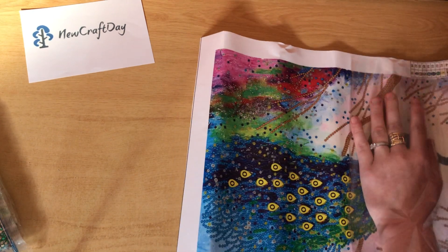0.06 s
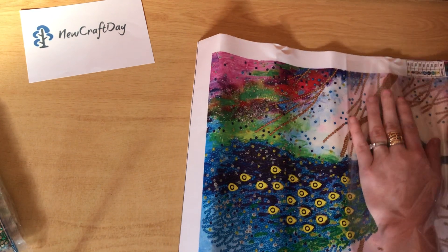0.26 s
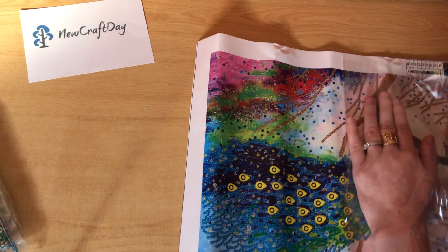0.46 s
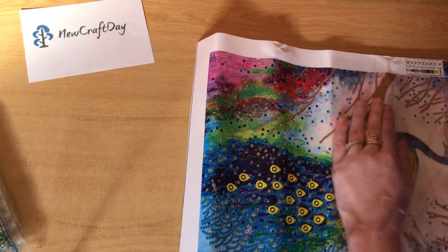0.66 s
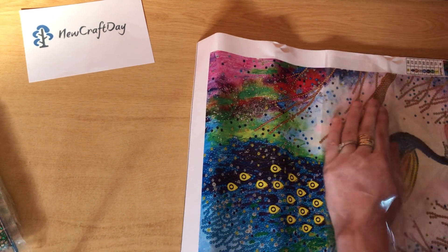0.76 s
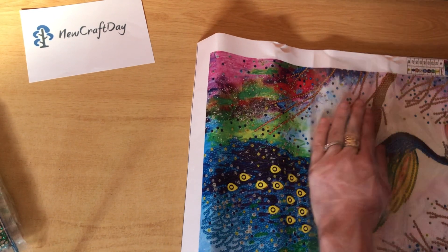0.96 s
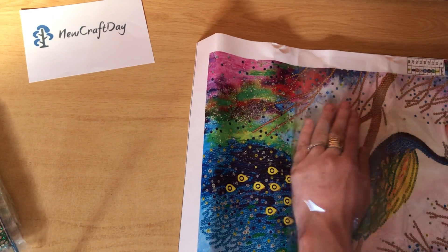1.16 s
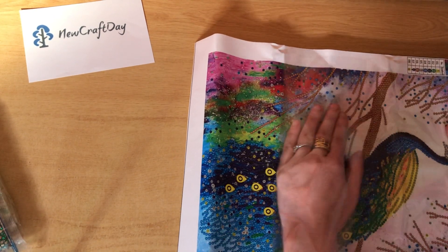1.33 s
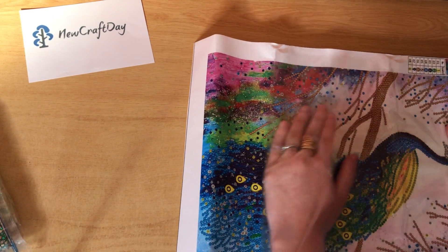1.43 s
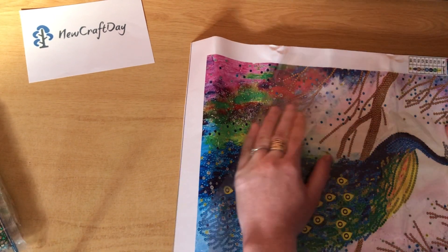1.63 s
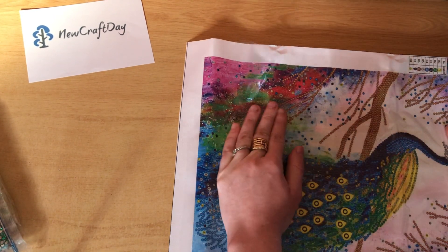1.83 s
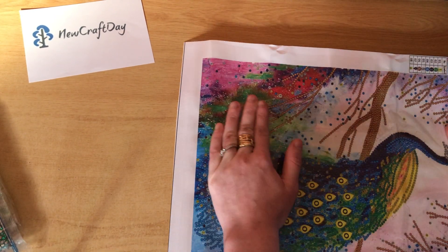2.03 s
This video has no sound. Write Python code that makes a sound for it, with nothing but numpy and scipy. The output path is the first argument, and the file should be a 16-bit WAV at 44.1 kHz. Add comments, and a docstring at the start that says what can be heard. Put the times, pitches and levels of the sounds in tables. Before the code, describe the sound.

Thin plastic cover film crackling and rustling under a smoothing palm, close up in a quiet room

```python
"""In a small room with a low hum, a hand smooths a plastic cover film flat over a canvas on a wooden table.
Creases snap as short runs of shaped noise, and taut patches of film ring as dying sine waves.
The sliding film is hiss plus random ticks; the palm rubs and swishes as soft, filtered noise.
Presses of the hand ring the table's low tones, and the room answers the film with a short tail of noise."""
import sys
import numpy as np
from scipy import signal
from scipy.fft import rfft, irfft, next_fast_len
from scipy.io import wavfile
from scipy.ndimage import map_coordinates

SR = 44100
rng = np.random.default_rng(int(sys.argv[2]) if len(sys.argv) > 2 else 0)


def store_wav(level_fs):
    """Save 16-bit WAV to argv[1]."""
    pcm = np.round(np.clip(np.atleast_2d(level_fs), -1, 1) * 32767)
    wavfile.write(sys.argv[1], SR, pcm.T.astype(np.int16))


N = 92610  # length of the scene in samples


def amp(db):
    """Turn decibels into a gain."""
    return 10 ** (np.asarray(db) / 20)


def unit(x):
    """Scale a sound to an rms of 1."""
    return x / np.sqrt(np.mean(x ** 2) + 1e-20)


def along(points, hz):
    """Read a table of (frequency, value) between its points, on a log frequency axis."""
    f, v = np.transpose(points)
    return np.interp(np.log(hz + 1), np.log(f + 1), v)


def curves(rows):
    """Draw one curve over the whole scene for each column after the time."""
    times, *columns = np.transpose(rows)
    return [np.interp(np.arange(N) / SR, times, column) for column in columns]


def add(track, start_s, sound):
    """Mix a sound into the track at a given time."""
    part = track[max(round(start_s * SR), 0):][:len(sound)]
    part += sound[:len(part)]


def filtered(x, response):
    """Multiply the spectrum of x by a response that depends on frequency."""
    size = next_fast_len(N + SR // 2)
    return irfft(rfft(x, size) * response(np.fft.rfftfreq(size, 1 / SR)), size)[:N]


def coloured(x, colour):
    """Shape x with a spectrum table, then scale it to an rms of 1."""
    return unit(filtered(x, lambda hz: amp(along(colour, hz))))


def causal(gain_db):
    """Make the sharpest impulse response with these gains that never sounds before its cause."""
    cepstrum = irfft(np.log(amp(gain_db)))
    # fold the backward half of time onto the forward half
    half = len(cepstrum) // 2
    cepstrum[1:half] *= 2
    cepstrum[half + 1:] = 0
    return irfft(np.exp(rfft(cepstrum)))


def lingering(power, decay_s):
    """Spread energy over an exponential decay."""
    keep = np.exp(-1 / (decay_s * SR))
    return np.abs(signal.lfilter([1 - keep], [1, -keep], power))


# steady hum tones: (frequency [Hz], level [dB])
HUM_TONES = [(66, -75), (156, -74), (376.5, -77)]
# colour of the room's rumble: (frequency [Hz], relative level [dB])
RUMBLE_COLOUR = [(24, -44), (44, -7), (68, -2.5), (120, -3.5), (250, -8), (550, -23.5), (1100, -7.5),
                 (3000, -10.5), (15000, -61)]
RUMBLE_DB = -62.5


def background():
    """The room's rumble is shaped noise; its faint hum is a few steady sine waves."""
    t = np.arange(N) / SR
    hum = np.zeros(N)
    for hz, db in HUM_TONES:
        hum += amp(db) * np.sqrt(2) * np.sin(2 * np.pi * (hz * t + rng.random()))
    return hum + amp(RUMBLE_DB) * coloured(rng.standard_normal(N), RUMBLE_COLOUR)


# how long the room takes to fade by 60 dB: (frequency [Hz], fade time [s])
ROOM_FADE = [(200, 0.047), (2500, 0.072), (7000, 0.25), (15000, 0.21)]
ROOM_DB, ROOM_DULL_HZ = -3.5, 8000  # the tail weakens toward the treble, by 3 dB at this frequency
NEAR_DB, NEAR_DECAY_S = -6.5, 0.0048  # the quick scatter off the table


def room(x, count=13):
    """Echoes blur into noise, band by band: a quick scatter off the table, then the room's short tail."""
    out = np.zeros(N)
    centres = np.geomspace(250, 14000, count)
    for k, centre in enumerate(centres):
        band = lambda hz: np.sqrt(along(np.c_[centres, np.eye(count)[k]], hz))
        power = filtered(x, band) ** 2
        near = lingering(power, NEAR_DECAY_S / 2)
        # a 60 dB fade is a millionfold drop in energy
        far = lingering(near, along(ROOM_FADE, centre) / np.log(10 ** 6))
        far_power = amp(ROOM_DB) ** 2 * far / (1 + (centre / ROOM_DULL_HZ) ** 2)
        level = np.sqrt(amp(NEAR_DB) ** 2 * near + far_power)
        out += level * unit(filtered(rng.standard_normal(N), band))
    return out


# soft presses of the hand on the table: (time [s], level [dB])
HAND_BUMPS = [(0.344, -54), (0.636, -55), (0.975, -44), (1.009, -61), (1.693, -55.5)]
# tones of the table top: (frequency [Hz], relative level [dB], time to fade by 60 dB [s])
TABLE_TONES = [(71, -0.5, 0.14), (112, 6.5, 0.052), (152, -6, 0.18), (252, -3, 0.048), (350, -7.5, 0.078)]
BUMP_ATTACK_CYCLES = 0.52  # build-up time of each tone


def bumps():
    """A press of the hand makes the table top thud softly, its lowest tones building up last."""
    out, t = np.zeros(N), np.arange(SR // 4) / SR
    for start_s, db in HAND_BUMPS:
        thud = np.zeros(len(t))
        for hz, level_db, t60 in TABLE_TONES:
            # each press excites the tones a little differently
            fade = amp(level_db + rng.normal(0, 1) - 60 * t / t60)
            build_up = 1 - np.exp(-hz * t / BUMP_ATTACK_CYCLES)
            thud += fade * build_up * np.sin(2 * np.pi * hz * t)
        add(out, start_s, amp(db) * thud)
    return out


# palm rubbing on the canvas: (time [s], level [dB])
PALM_RUB = [(0,-59.5), (.5,-68), (1,-61), (1.18,-56), (1.3,-65), (1.5,-57), (1.65,-60.5), (1.72,-52),
            (1.88,-60), (2.1,-65.5)]
# colour of the rub: (frequency [Hz], relative level [dB])
RUB_COLOUR = [(60, -65), (170, 1), (700, 1), (1100, 2), (1800, -5), (5000, -15)]
# hollow swishes and a faint squeak of the dragging hand, as bell curves in time and pitch:
# (peak time [s], spread in time [s], level [dB], centre [Hz], glide [octaves per s], width [octaves])
HAND_SWISHES = [(.005,0.02,-61,530,3,.3), (0.29,0.031,-56.5,1140,0.5,0.1), (1.082,0.022,-56,825,14,0.46),
                (1.182,0.031,-56.5,258,-13,0.84), (2.038,0.028,-62,1100,-.3,0.08)]


def palm():
    """Skin rubs dully over the canvas; narrow bands of noise swish by, gliding up or down in pitch."""
    level_db, = curves(PALM_RUB)
    out = amp(level_db) * coloured(rng.standard_normal(N), RUB_COLOUR)
    for peak_s, spread_s, db, centre, glide, width in HAND_SWISHES:
        hz, t, noise = signal.stft(rng.standard_normal(N), SR, nperseg=1024)
        pitch_hz = centre * 2 ** (glide * np.clip(t - peak_s, -2 * spread_s, 2 * spread_s))
        octaves_away = np.log2((hz[:, None] + 1) / pitch_hz)
        # the square root keeps the loudness even while the pitch glides
        band = np.exp(-.5 * (octaves_away / width) ** 2) / np.sqrt(pitch_hz)
        swish = unit(signal.istft(noise * band, SR, nperseg=1024)[1][:N])
        swell = np.exp(-.5 * ((np.arange(N) / SR - peak_s) / spread_s) ** 2)
        out = out + amp(db) * swish * swell
    return out


TICK_SPREAD_DB = 13  # how much the ticks differ in size


def grains(per_s, decay_s):
    """Outline tiny ticks at random times and of random sizes, scaled to an rms of 1."""
    sizes = amp(TICK_SPREAD_DB * rng.uniform(-1.33, 1, N))
    ticks = sizes * (rng.random(N) < per_s / SR)
    # spreading twice rounds off the start of each tick
    return unit(np.sqrt(lingering(lingering(ticks ** 2, decay_s / 2), decay_s / 2)))


# film sliding: (time [s], level of the body [dB], level of the treble [dB])
FILM_SLIDE = [(0,-55,-75), (.205,-54.5,-66), (.222,-42,-41.5), (.26,-52.5,-55), (.33,-50,-61),
              (.385,-43.5,-49), (.44,-50.5,-56), (.525,-53,-58), (.58,-54.5,-58), (.65,-45.5,-43.5),
              (.73,-54.5,-56.5), (.86,-51.5,-80), (1,-52.5,-54), (1.19,-60,-63.5), (1.40,-57.5,-50.5),
              (1.49,-46.5,-39.5), (1.57,-49,-47.5), (1.675,-53.5,-51), (1.705,-44.5,-34.5),
              (1.77,-45.5,-48.5), (1.88,-55,-54.5), (2.1,-77.5,-68)]
# colour of the body: (frequency [Hz], relative level [dB])
BODY_COLOUR = [(200, -15.5), (700, -25), (1200, -5), (1900, -6), (2600, -1), (3600, 0), (4900, -7),
               (6000, -4.5), (9000, -16.5), (16000, -18)]
# colour of the treble fizz: (frequency [Hz], relative level [dB])
TREBLE_COLOUR = [(1000, -16), (4000, 0.5), (6000, 3.5), (7600, -2.5), (9000, 4), (10500, -5.5),
                 (12500, 2.5), (15500, -11)]
CRACKLE_PER_S, CRACKLE_DECAY_S = 380, 0.0016
PINPRICKS_PER_S, PINPRICK_DECAY_S = 220, 0.00069  # the thinnest wrinkles tick only in the treble
# shares of smooth hiss and of ticks in each layer
BODY_HISS_DB, BODY_TICKS_DB, FIZZ_HISS_DB, FIZZ_TICKS_DB = -4.5, -2, -11.5, -0.5


def rustle():
    """Sliding film rubs with a steady hiss while countless tiny wrinkles tick over it."""
    body_db, treble_db = curves(FILM_SLIDE)
    body_noise, crackle_noise, fizz_noise, pinprick_noise = rng.standard_normal((4, N))
    crackle = coloured(crackle_noise * grains(CRACKLE_PER_S, CRACKLE_DECAY_S), BODY_COLOUR)
    pinpricks = coloured(pinprick_noise * grains(PINPRICKS_PER_S, PINPRICK_DECAY_S), TREBLE_COLOUR)
    body = amp(BODY_HISS_DB) * coloured(body_noise, BODY_COLOUR) + amp(BODY_TICKS_DB) * crackle
    fizz = amp(FIZZ_HISS_DB) * coloured(fizz_noise, TREBLE_COLOUR) + amp(FIZZ_TICKS_DB) * pinpricks
    return amp(body_db) * body + amp(treble_db) * fizz


SNAP_WINDOW_S = .005  # snap and ping levels are rms values over this time


def levelled(sound, db):
    """Give a short sound the energy of this level held for the snap window."""
    return amp(db) * np.sqrt(SNAP_WINDOW_S * SR) * sound / np.linalg.norm(sound)


# taut patches of film ringing: (time [s], level [dB], pitch [Hz])
FILM_PINGS = [(0.2118,-48,1520), (.349,-44,1117), (.376,-40,2220), (.553,-47.5,1537), (0.937,-30.5,6820),
              (1.074,-37.5,9360)]
PING_CYCLES = 14  # cycles for the ring to fall to about a third


def pings():
    """Taut patches of film ring briefly as their crease lets go."""
    out, t = np.zeros(N), np.arange(SR // 10) / SR
    for start_s, db, hz in FILM_PINGS:
        ring = np.sin(2 * np.pi * hz * t) * np.exp(-hz * t / PING_CYCLES)
        add(out, start_s, levelled(ring, db))
    return out


# creases buckling: (time [s], level [dB], brightness [dB per octave], time scale [ms])
CREASE_SNAPS = [(0.0322,-40,-5,5.7), (0.171,-42.5,-8.5,3.1), (0.2106,-34.5,-5,2.5), (0.271,-47,-11.5,1.3),
                (0.3058,-39,-3,3), (0.345,-38,2,1.3), (0.3485,-29,-5,2.3), (0.3744,-32.5,-4,4),
                (.5166,-44,-7,1.3), (0.5528,-31.5,-2.5,0.8), (0.5964,-32,-3,1), (.608,-33.5,-4,3.1),
                (0.6292,-29.5,-2,2.55), (0.6688,-39,-3,2), (0.7483,-35.5,0,4), (0.753,-33.5,-1,0.65),
                (0.7747,-32,3.5,0.75), (0.7857,-44.5,0,1.75), (0.8074,-34,3,0.55), (0.8146,-38,1,0.51),
                (0.8305,-30.5,2,1.7), (0.8438,-38.5,5,0.45), (0.853,-36.5,-5.5,2.9), (0.8675,-24,3,2.4),
                (0.8922,-35,0.5,3.3), (0.9185,-40.5,0,1.1), (.938,-23.5,1.5,0.97), (0.966,-33.5,-2,0.97),
                (1.008,-37.5,-4,8.2), (1.021,-34,-6,4.5), (1.0737,-33.5,-1.5,0.55), (1.2336,-36,-1.5,1.5),
                (1.2905,-44.5,-3,2.3), (1.3311,-52,5,.4), (1.3449,-30,2.5,3.3), (1.4151,-42,-3.5,1.2),
                (1.4386,-39.5,-1.5,1.4), (1.466,-28.5,2,2), (1.481,-34.5,0,1.8), (1.4902,-38.5,0,1.7),
                (1.5113,-31,-1,0.97), (1.546,-32.5,1.5,0.78), (1.547,-35.5,-3,1.3), (1.5968,-31.5,3,0.54),
                (1.611,-36,-2.5,0.86), (1.6934,-29.5,2,5.4), (1.723,-25.5,4.5,0.97),
                (1.7455,-24.5,6.5,0.38), (1.7496,-30.5,5,0.55), (1.7664,-32.5,0,1.2), (1.7985,-36.5,1,0.7),
                (1.833,-41,-1,0.97), (1.9107,-48,12,0.43)]
# colour shared by all snaps: (frequency [Hz], relative level [dB])
CREASE_COLOUR = [(150, -46), (780, -19), (1280, -6), (2200, -5), (3800, 3), (4900, -1.5), (6300, 4.5),
                 (7700, 0), (9000, 3.5), (10500, -2.5), (13000, 1.5), (15500, -5)]
TILT_FROM_HZ = 3460  # brightness acts above this frequency
FACET_DB, FACET_SPACING_HZ = 2, 830  # each crease has resonances of its own
SLIP_SPREAD = 0.32  # unevenness of the tiny slips within a snap
SLIP_EVENNESS = 0.19  # how evenly a run of slips spreads over frequency, 0-1
SNAP_RISE, SNAP_HOLD = 0.091, 1.58  # build-up and hold of the slips, in time scales
SNAP_FALL = 4.4  # steepness of the fall after the hold, per time scale


def snaps():
    """Each crease gives way in a quickly dying run of tiny slips that ring its own patch of film."""
    size = 2048
    out, t, hz = np.zeros(N), np.arange(size) / SR, np.fft.rfftfreq(size, 1 / SR)
    for start_s, db, tilt, scale_ms in CREASE_SNAPS:
        slips, uneven, facets = rng.standard_normal((3, size))
        age = t / (scale_ms / 1000)
        rise = 1 - np.exp(-age / SNAP_RISE)
        fall = np.exp(-SNAP_FALL * np.maximum(age - SNAP_HOLD, 0))
        run = slips * np.exp(SLIP_SPREAD * np.clip(uneven, -2, 2)) * rise * fall
        # partly level out the peaks and dips in the run's own spectrum
        power = np.abs(rfft(run)) ** 2
        evened = -10 * np.log10(power + power.mean() / 10) * SLIP_EVENNESS
        ripple = FACET_DB * map_coordinates(facets, [hz / FACET_SPACING_HZ])
        slope = tilt * np.log2(np.maximum(hz, TILT_FROM_HZ) / TILT_FROM_HZ)
        patch = causal(along(CREASE_COLOUR, hz) + slope + ripple + evened)
        add(out, start_s, levelled(signal.fftconvolve(run, patch), db))
    return out


def scene():
    """Mix film, hand, table and background; only the film's sound gets the room's echoes."""
    film = snaps() + pings() + rustle()
    return (background() + room(film) + bumps() + palm() + film)[None]


TOP_HZ = 15900


def record(dry):
    """The recorder cuts steeply above its band limit."""
    return np.array([filtered(x, lambda hz: 1 / np.sqrt(1 + (hz / TOP_HZ) ** 120)) for x in dry])


dry = scene()
out = record(dry)
store_wav(out)
```